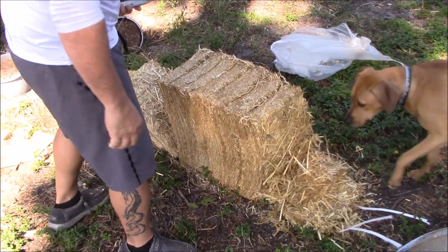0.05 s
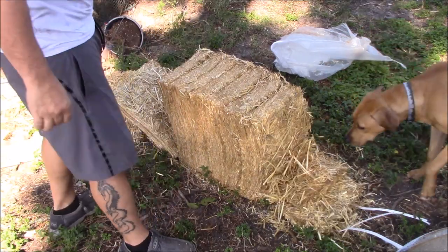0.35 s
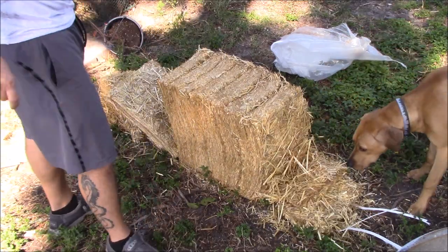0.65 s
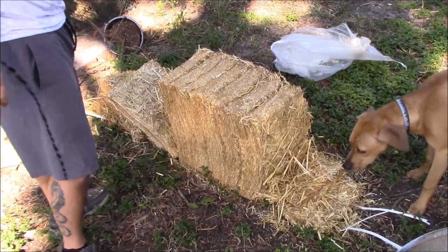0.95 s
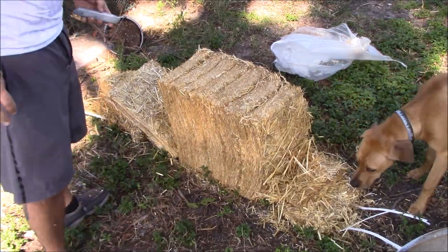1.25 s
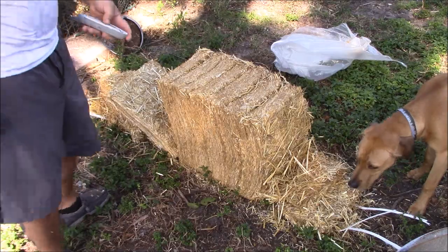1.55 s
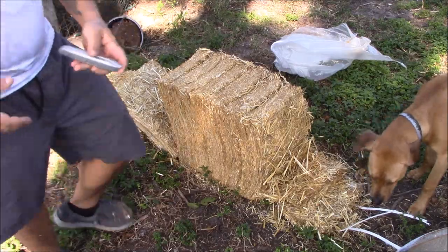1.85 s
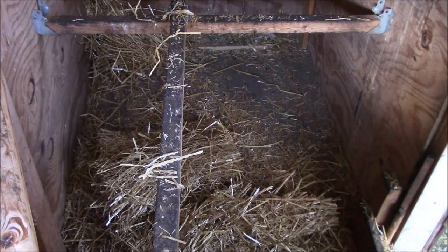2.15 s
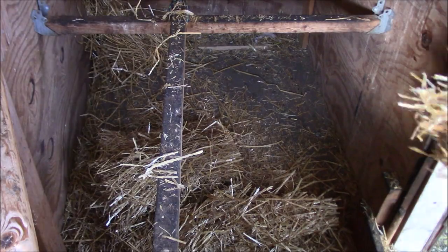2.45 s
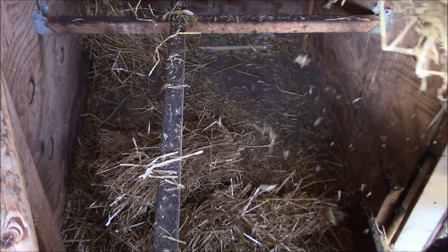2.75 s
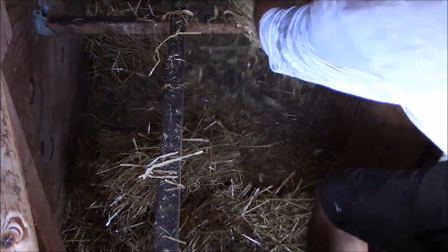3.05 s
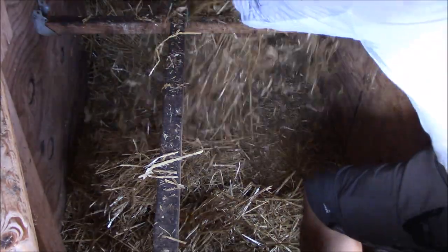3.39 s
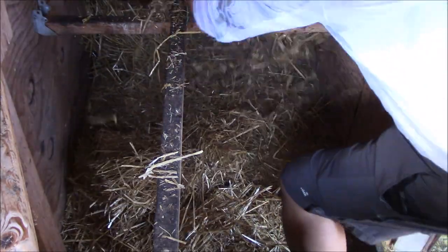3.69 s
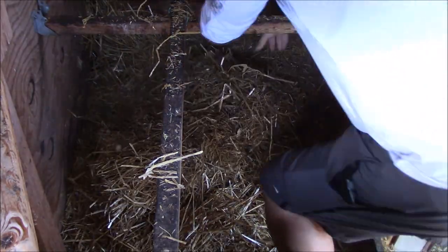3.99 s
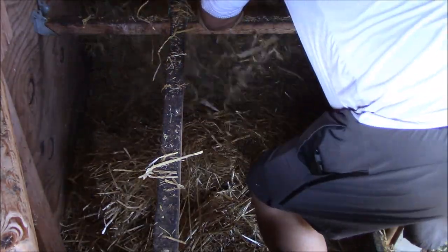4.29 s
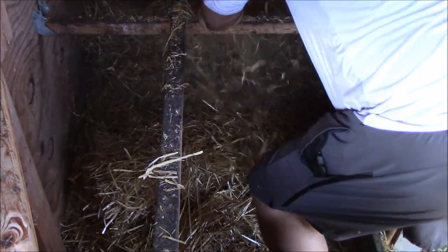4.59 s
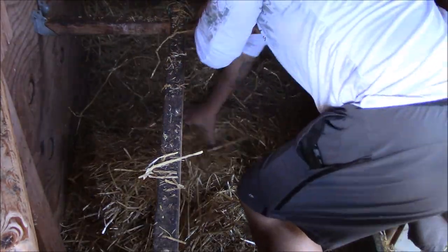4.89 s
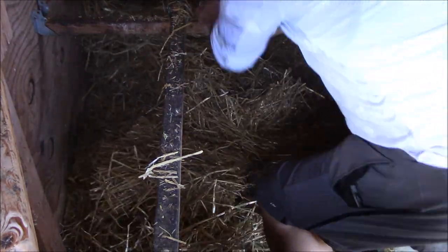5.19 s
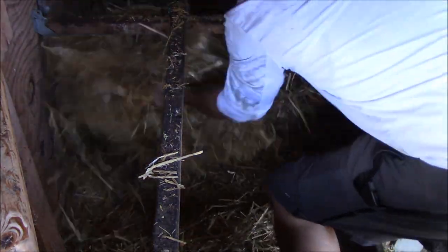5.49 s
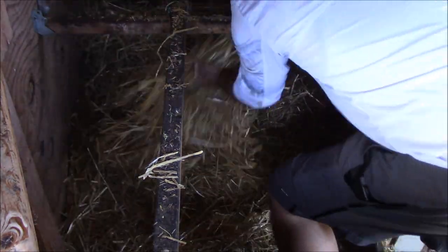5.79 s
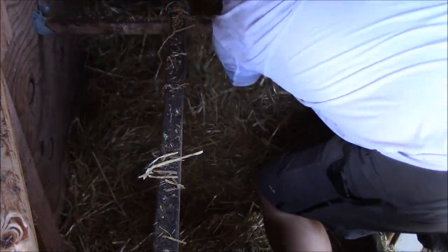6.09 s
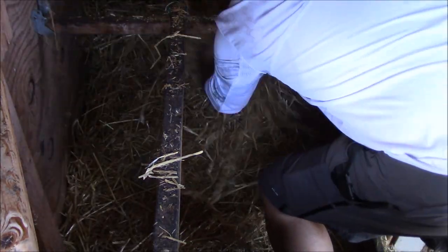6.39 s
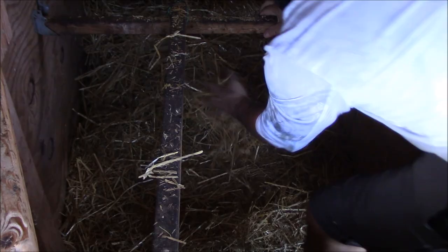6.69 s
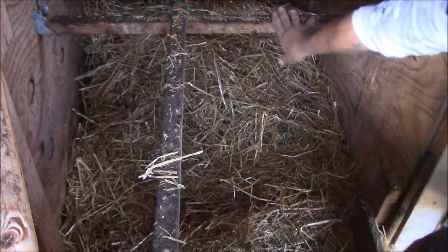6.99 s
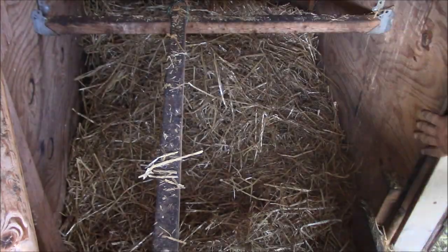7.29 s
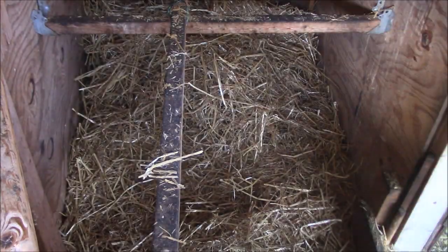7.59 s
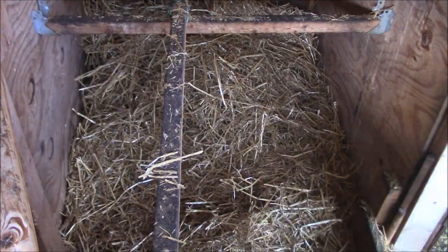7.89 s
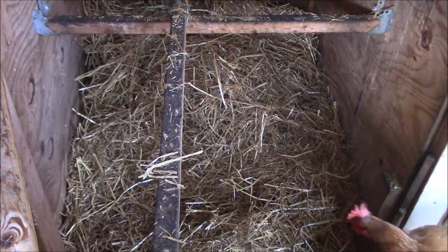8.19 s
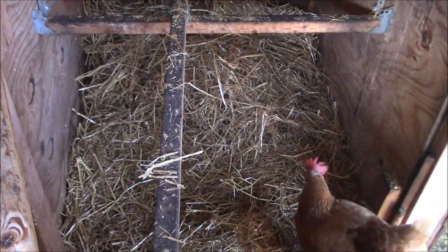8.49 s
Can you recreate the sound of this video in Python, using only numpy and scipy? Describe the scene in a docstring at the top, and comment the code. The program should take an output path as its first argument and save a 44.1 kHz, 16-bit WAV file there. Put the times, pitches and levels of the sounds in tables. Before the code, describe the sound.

A quiet yard opens with low outdoor air, faint shuffling on grass and tiny distant chirps. Sharp little clicks cluster between 0.5 and 0.8 seconds, a dull knock follows at 0.9, and a light gust touches the microphone around 1.5. At 2 seconds the sound cuts to a small, boxy plywood coop, heard close. Dry straw tears loudly, with thin squeals, a sharp snap and knocks on the boards around 2.3. From 3 to 7 seconds handfuls are shaken and packed down in waves of crunching and bright crackling, with scattered snaps and a firm wooden bump near 4. A chicken chatters softly in short, squeaky gliding notes, mostly from 4.3 to 7.7. The straw eases after 7, then rasps again with a thin high squeal around 7.8. A few more chicken notes and a last rustle come at about 8.5 seconds.

```python
"""A few sharp clicks and a dull knock sound beside a straw bale, over the low air of a yard.
After two seconds the scene jumps to a small plywood coop, where a hand tears straw loose and packs it down.
Countless tiny breaks make the straw crunch, rasp and crackle; thick stalks snap, and sliding ones squeal.
The boards ring briefly when bumped, and a bird chatters in short gliding notes."""
import sys
import numpy as np
from scipy import signal
from scipy.fft import rfft, irfft
from scipy.io import wavfile

SR = 44100
rng = np.random.default_rng(int(sys.argv[2]) if len(sys.argv) > 2 else 0)


def materialize(psi):
    """Save the field psi as 16-bit PCM at rate SR to the path in sys.argv[1].

    A 1-D psi becomes a single channel; in a 2-D psi each row is a channel.
    """
    bounded = np.clip(np.atleast_2d(psi).T, -1, 1)
    quanta = np.round(bounded * 32767).astype(np.int16)
    wavfile.write(sys.argv[1], SR, quanta)


N = 381465
TIME = np.arange(N) / SR
FREQS = np.maximum(np.fft.rfftfreq(N, 1 / SR), 1)


def from_db(db):
    """Decibels to gain."""
    return 10 ** (np.asarray(db) / 20)


def fader(rows):
    """A gain curve through (seconds, dB) points."""
    return from_db(np.interp(TIME, *np.transpose(rows)))


def drift(rate, size):
    """A random wander with a spread of about 1, turning `rate` times a second."""
    knots = rng.standard_normal(int(size * rate / SR) + 2)
    return np.interp(np.arange(size) * rate / SR, np.arange(len(knots)), knots) * np.sqrt(3 / 2)


def add(out, s, sound):
    """Mix a sound in at s seconds."""
    start = int(s * SR)
    out[start:start + len(sound)] += sound[:N - start]


def low_cut(x, hz):
    """Take away the bass."""
    return signal.sosfilt(signal.butter(4, hz, "high", fs=SR, output="sos"), x)


def colour(x, spectrum, band=(1, SR), resonances=()):
    """Shape x with an EQ curve and resonant peaks; rms 1 inside the band."""
    hz, db = np.transpose(spectrum)
    shape_db = np.interp(np.log(FREQS), np.log(hz), db)
    for centre, width, lift in resonances:
        shape_db = shape_db + lift / (1 + (2 * (FREQS - centre) / width) ** 2)
    bins = rfft(x) * from_db(shape_db)
    inside = (FREQS > band[0]) & (FREQS < band[1])
    return irfft(bins, N) * N / np.sqrt(2 * np.sum(np.abs(bins[inside]) ** 2))


def fade(energy, t60):
    """Each impulse of energy dies away by 60 dB in t60 seconds."""
    return signal.lfilter([1], [1, -from_db(-120 / (t60 * SR))], energy + 1e-18)


def impulses(rows):
    """One impulse for each (seconds, dB) row."""
    out = np.zeros(N)
    for s, db in rows:
        out[int(s * SR)] += from_db(db)
    return out


def fractures(per_s, spread_db, t60):
    """Energy of random tiny breaks, many weak and a few strong; mean 1."""
    breaks = rng.random(N) < per_s / SR
    strength = from_db(spread_db * np.clip(rng.standard_normal(N), -2.3, 2.3))
    energy = fade(breaks * strength ** 2, t60)
    return energy / energy.mean()


def grains(per_s, spread_db, t60, broad, rub):
    """Breaks ring in their own stalk's band or crack across all bands (share `broad`), over smooth rub."""
    edges = np.geomspace(400, 16000, 14)
    out = np.zeros(N)
    shared = fractures(per_s, spread_db, t60)
    white = rng.standard_normal((2, N))   # neighbouring bands get unrelated noise
    for k, (low, high) in enumerate(zip(edges, edges[1:])):
        energy = broad * shared + (1 - broad) * fractures(per_s, spread_db, t60) + rub
        corners, kind = ([low, high], "band") if k else (high, "low")
        band = signal.butter(2, corners, kind, fs=SR, output="sos")
        out += signal.sosfilt(band, np.sqrt(energy) * white[k % 2])
    return out


def strike(modes, vary_db):
    """Decaying modes, each with a new strength for every blow; peak 1."""
    t = TIME[:SR // 4]
    hz, db, t60 = np.transpose(modes)[:, :, None]
    strength = from_db(db + vary_db * rng.standard_normal(hz.shape)) * rng.choice([-1, 1], hz.shape)
    ring = np.sum(strength * np.exp(-np.log(1000) * t / t60) * np.sin(2 * np.pi * hz * t), axis=0)
    return ring / np.abs(ring).max()


def gliding_tones(rows, body, wobble_hz, flutter_db, rasp, fall_db):
    """Tones swell, glide and fade; a body weights their overtones, and roughness makes them hoarse."""
    out, harmonics = np.zeros(N), np.arange(1, 7)
    body_hz, body_db = np.transpose(body)
    for s, length, hz, glide, db, rough in rows:
        size = int(length * SR)
        progress = np.linspace(0, 1, size)
        pitch = hz * 2 ** (glide * (progress - .5)) + wobble_hz * rough * drift(480, size)
        phase = 2 * np.pi * np.cumsum(pitch) / SR
        lift_db = np.interp(np.log(harmonics * hz), np.log(body_hz), body_db)
        partials = from_db(lift_db - fall_db * np.log2(harmonics)) * (harmonics * hz < SR / 2)
        tone = partials @ np.sin(np.outer(harmonics, phase)) / np.linalg.norm(partials)
        swell = np.abs(np.sin(np.pi * progress)) ** 0.52
        swell *= from_db(flutter_db * rough * drift(220, size))
        swell *= 1 + rasp * rough * drift(2500, size)
        add(out, s, from_db(db) * tone * swell / np.sqrt(np.mean(swell ** 2) / 2))
    return out


def reflections(x, t60, dull_hz):
    """Dense, dull echoes from nearby surfaces, in two unrelated channels."""
    t = TIME[:SR // 4]
    echoes = rng.standard_normal((2, len(t))) * np.exp(-np.log(1000) * t / t60) * (t > .003)
    echoes = signal.sosfilt(signal.butter(1, dull_hz, fs=SR, output="sos"), echoes)
    echoes /= np.sqrt(np.sum(echoes ** 2, axis=1, keepdims=True))
    return signal.fftconvolve(x[None], echoes, axes=1)[:, :N]


# EQ of the outdoor bed. Each row: frequency in Hz, gain in dB.
AIR_EQ = [(15, -48), (25, -69), (85, -8.5), (243, -2.5), (496, -4), (525, -7), (554, -5), (1220, -11.5),
          (1520, -15.5), (2000, -19), (2600, -52), (4400, -120)]

def outdoor_air():
    """A steady bed of low outdoor rumble."""
    return from_db(-51.5) * colour(rng.standard_normal(N), AIR_EQ)


# The breeze swells and eases. Each row: time in seconds, level in dB before gusts.
BREEZE_FADER = [(0, -76), (1.05, -71), (1.55, -56.5), (2.0, -67)]

def breeze():
    """Light gusts rumble on the microphone, partly on each side separately."""
    eddies = rng.standard_normal(N) + from_db(-1) * rng.standard_normal((2, N))
    rumble = signal.sosfilt(signal.butter(2, [45, 140], "band", fs=SR, output="sos"), eddies)
    gusts = from_db(1.6 * drift(7.8, N))
    return fader(BREEZE_FADER) * gusts * rumble / rumble.std()


# Movement on the grass. Each row: time in seconds, relative level in dB.
SHUFFLE_FADER = [(0.0, -49), (0.412, -53), (0.782, -53.5), (0.948, -55), (1.98, -56)]
# EQ of the grass and the far chirps. Each row: frequency in Hz, gain in dB.
YARD_EQ = [(900, -2.5), (2000, 1), (3000, 0), (4500, -6), (7000, -8.5), (11000, -15), (16000, -24)]

def grass():
    """Faint shuffling on grass: mostly smooth rub, with a fine grain of breaks."""
    rustle = grains(per_s=420, spread_db=4, t60=0.014, broad=1.0, rub=3.3)
    return from_db(1) * fader(SHUFFLE_FADER) * colour(rustle, YARD_EQ)


# Distant calls. Each row: start and length in seconds, pitch in Hz, glide in octaves,
# relative level in dB, roughness from 0 to 1.
FAR_CHIRPS = [(.19, 0.052, 2520, 0.25, -46.5, 0.64), (1.275, 0.02, 1116, -.05, -51, 0.35),
              (1.33, 0.073, 3020, -0.069, -61, 0.1), (1.56, .092, 2920, -0.044, -62, 0.26),
              (1.642, 0.013, 1230, 0.021, -50.5, .2), (1.79, 0.088, 2960, .07, -60, .46)]

def far_chirps():
    """Faint chirps with few overtones, each trailing a soft echo."""
    calls = gliding_tones(FAR_CHIRPS, YARD_EQ, wobble_hz=254, flutter_db=4.5, rasp=0.96, fall_db=22)
    return from_db(3) * calls + from_db(-5.5) * reflections(calls, t60=0.51, dull_hz=6000)[0]


# Knocks on the ground. Each row: start in seconds, level in dB.
KNOCKS = [(0.917, -25), (0.942, -36.5), (0.962, -36)]
# Their dull tone. Each row: frequency in Hz, gain in dB.
KNOCK_EQ = [(30, -40), (90, -25), (170, -10), (240, 5), (420, 2.5), (760, -1.5), (900, -20), (1300, -10),
            (3000, -19), (9000, -31)]

def ground_knocks():
    """The ground answers each knock with a short, dark burst of noise."""
    envelope = np.sqrt(fade(impulses(KNOCKS) ** 2, t60=0.12))
    return envelope * colour(rng.standard_normal(N), KNOCK_EQ)


# Clicks in the yard. Each row: start in seconds, relative level in dB.
CLICK_HITS = [(.493, -25), (.5084, -12.5), (.5495, -19.5), (.6327, -8.5), (.66, -14.5), (.6755, -5.5),
              (.7377, -18), (.886, -27), (.917, -20.5), (.942, -26.5), (1.508, -22.5)]
# Their ring. Each row: frequency in Hz, relative level in dB, 60 dB decay time in seconds.
CLICK_RING = [(1900, -54, 0.02), (2690, -32, .02), (3720, 0, 0.023), (4150, -1.5, 0.03),
              (4610, -0.5, 0.022), (6000, -39, .025), (8230, -5, 0.031), (9960, 1, 0.022)]
# The bright crack of clicks and snapping stalks. Each row: frequency in Hz, gain in dB.
CRACK_EQ = [(60, -53), (400, -25.5), (1500, -0.5), (4500, 6.5), (9000, 2.5), (15500, -3.5)]

def clicks():
    """A small hard object clicks: a bright crack, a brief ring and a faint tail."""
    ring = np.zeros(N)
    for s, db in CLICK_HITS:
        add(ring, s, from_db(db) * strike(CLICK_RING, vary_db=1))
    energy = impulses(CLICK_HITS) ** 2
    burst = np.sqrt(fade(energy, t60=0.026) + from_db(-41.5) * fade(energy, t60=0.28))
    return from_db(-5.5) * ring + from_db(-11) * burst * colour(rng.standard_normal(N), CRACK_EQ)


# Single squeaky notes. Each row: start and length in seconds, pitch in Hz, glide in octaves,
# relative level in dB, roughness from 0 to 1.
BIRD_CALLS = [(2.526, .014, 2360, -.05, -41, 0.3), (2.558, 0.03, 4110, 0.034, -42, 0.4),
              (2.605, 0.036, 2780, -.35, -42, 0.87), (2.642, 0.093, 2365, -.025, -39.5, 0.3),
              (2.757, 0.0094, 2150, -0.2, -36.5, 0.3), (2.803, .012, 1400, 0.0078, -39.5, .56),
              (4.974, 0.019, 1704, -0.11, -35, .3), (5.007, 0.059, 1685, .03, -32, 0.14),
              (5.355, 0.025, 1835, -0.022, -34.5, 0.8), (5.441, 0.023, 1676, -0.044, -31.5, 0.25),
              (5.487, 0.03, 1740, 0.075, -35, 0.63), (5.957, 0.024, 1653, -0.13, -30.5, 0.18),
              (5.997, 0.048, 1740, 0.38, -34, .23), (6.067, 0.026, 1470, -0.39, -30, 0.56),
              (6.117, 0.046, 3200, 0.45, -38.5, 0.4), (6.156, 0.11, 3464, 0.16, -36.5, 0.9),
              (6.3, 0.037, 3350, 0.29, -37, 0.8), (6.383, .026, 3320, .15, -39, 0.66),
              (6.622, 0.015, 1860, .14, -35.5, .9), (6.678, .037, 2950, -0.056, -42.5, 0.3),
              (6.775, 0.058, 1546, -0.056, -38.5, 0.08), (6.886, 0.02, 1624, -.18, -32, 0.38),
              (6.958, .014, 1590, -0.15, -29.5, .37), (6.985, .03, 1276, -0.2, -47, 0.08),
              (7.075, 0.041, 1166, -0.307, -40.5, .45), (7.388, 0.07, 1904, -0.09, -38.5, 0.24),
              (7.45, 0.041, 1620, -0.3, -43.5, 0.18), (7.516, 0.057, 1335, -.26, -47, 0.47),
              (7.606, 0.086, 1770, 0.42, -43.5, 0.4), (8.35, 0.052, 2680, -0.083, -46.5, .3),
              (8.392, .036, 3090, .3, -38, 0.7)]
# Even runs of short notes. Each row: start in seconds, note count, spacing in seconds, pitch in Hz,
# glide in octaves, relative level in dB, roughness from 0 to 1.
BIRD_RUNS = [(4.276, 3, 0.034, 2240, -0.0027, -32, .3), (4.378, 2, .04, 3940, .18, -31.5, .55),
             (5.121, 4, .058, 1626, 0.19, -35.5, .9), (5.247, 2, .06, 2250, .05, -38.5, .5),
             (8.459, 2, 0.042, 2325, 0, -27.5, 0.4)]
# Resonances of the throat. Each row: frequency in Hz, gain in dB.
THROAT_EQ = [(1200, 2), (1650, 1.5), (2300, -6), (3300, -0.5), (4600, 5), (5050, -5.5), (6600, -9),
             (10000, -9.5), (13500, -20)]

def bird():
    """A bird squeaks and chatters near the coop: short gliding notes, some clear, some hoarse."""
    note_share, scatter_octaves = 0.28, 0.016
    notes = list(BIRD_CALLS)
    for s, count, spacing, hz, glide, db, rough in BIRD_RUNS:
        for k in range(count):
            pitch = hz * 2 ** (scatter_octaves * rng.standard_normal())
            notes.append((s + k * spacing, note_share * spacing, pitch, glide, db, rough))
    voice = gliding_tones(notes, THROAT_EQ, wobble_hz=171, flutter_db=4.5, rasp=0.5, fall_db=5.5)
    return from_db(0.43) * low_cut(voice, hz=600)


# Bumps on the coop. Each row: start in seconds, relative peak in dB, low cut and high cut in Hz.
BOARD_HITS = [(2.08, -14, 251, 1500), (2.133, -11, 775, 2500), (2.287, -6, 480, 2500),
              (2.883, -27.5, 338, 1190), (3.943, -11.5, 297, 1500), (3.947, -3.5, 188, 1700),
              (3.95, -33, 55, 200), (3.957, -26, 300, 1200), (4.071, -22.5, 490, 1800),
              (4.391, -26, 220, 1200), (4.874, -21, 696, 2500), (4.884, -20, 640, 2500),
              (6.263, -18, 730, 1800), (7.366, -13.5, 517, 600)]
# The plywood's ring. Each row: frequency in Hz, relative level in dB, 60 dB decay time in seconds.
BOARD_MODES = [(250, 6, 0.02), (350, -9, 0.057), (497, 6.5, 0.029), (601, 6.5, 0.034), (790, 6.5, 0.02),
               (990, -7, 0.03), (1253, -2, 0.052), (1200, 13, 0.0065), (1620, 10, 0.0066),
               (2121, -7.5, 0.071), (3620, -4, 0.057)]

def board_bumps():
    """Blows on wood: light ones miss the low modes, soft ones the high modes."""
    out = np.zeros(N)
    for s, db, low_hz, high_hz in BOARD_HITS:
        lightness = signal.butter(5, low_hz, "high", fs=SR, output="sos")
        softness = signal.butter(1, high_hz, fs=SR, output="sos")
        thud = signal.sosfilt(np.vstack([lightness, softness]), strike(BOARD_MODES, vary_db=1.5))
        add(out, s, from_db(db) * thud / np.abs(thud).max())
    return from_db(-3) * out


# Dry stalks sliding. Each row: start and length in seconds, pitch in Hz, glide in octaves,
# relative level in dB, roughness from 0 to 1.
STALK_SLIDES = [(2.205, .014, 12100, -.01, -20, 0.4), (2.207, 0.04, 7050, -0.068, -13.5, 0.26),
                (2.222, .017, 6040, -.02, -23, .1), (2.241, 0.035, 6730, -0.022, -18, 0.16),
                (2.294, .017, 5930, -.02, -25, .2), (2.305, 0.021, 6520, 0.021, -27.5, .15),
                (2.397, 0.089, 6645, -0.003, -25, .12), (7.711, .016, 12250, -.02, -37, 1),
                (7.791, .046, 15330, 0, -14, .08), (7.835, 0.064, 15400, 0, -18.5, .15)]
# How well a stalk radiates its overtones. Each row: frequency in Hz, gain in dB.
STALK_EQ = [(6600, -1.5), (13500, -1)]

def stalk_squeals():
    """Stalks stick and slip on each other; uneven slips add rasp, and thin stalks radiate no bass."""
    squeal = gliding_tones(STALK_SLIDES, STALK_EQ, wobble_hz=219, flutter_db=7, rasp=0.58, fall_db=5.5)
    return from_db(0.7) * low_cut(squeal, hz=600)


# Single stalks breaking. Each row: start in seconds, relative level in dB, 60 dB decay time in seconds.
STALK_BREAKS = [(2.283, -8, 0.11), (2.611, -28.5, .056), (3.3467, -19, .025), (3.639, -21, 0.029),
                (4.009, -24, 0.026), (4.241, -26, .025), (4.441, -21, 0.017), (5.156, -23, .03),
                (5.933, -22.5, 0.054), (6.465, -15.5, 0.019), (6.547, -25, 0.043), (7.089, -32, 0.11),
                (7.311, -21, 0.016), (8.047, -28, 0.19), (8.264, -23, 0.042), (8.563, -27.5, 0.093)]

def stalk_snaps():
    """A thick stalk breaks with a crack and a short splintering tail."""
    energy, t = np.zeros(N), TIME[:SR // 4]
    for s, db, t60 in STALK_BREAKS:
        add(energy, s, from_db(db - 60 * t / t60) ** 2)
    cracks = np.sqrt(energy) * colour(rng.standard_normal(N), CRACK_EQ)
    return from_db(-4.5) * low_cut(cracks, hz=130)


# Handfuls shaken loose. Each row: start and end of the hold, rise time and fall time, all in seconds,
# then relative crush and crackle levels in dB.
SHAKES = [(3.13, 3.925, 0.62, 0.5, -44, -35), (4.219, 4.766, 0.13, 0.23, -43, -34.5),
          (5.028, 5.203, 0.34, 0.17, -46, -37.5), (5.447, 5.755, .07, 0.53, -46, -34),
          (5.98, 6.579, 0.26, 0.44, -45, -34)]
# Quick grabs and shoves. Each row: peak time and length in seconds,
# then relative crush, tear and crackle levels in dB.
QUICK_GRABS = [(2.048, 0.043, -51, -51, -41), (2.088, 0.049, -32.5, -38, -27),
               (2.167, 0.097, -30.5, -32.5, -37), (2.219, 0.089, -30.5, -24.5, -25),
               (2.29, 0.1, -25, -24, -33.5), (2.438, 0.095, -53, -51, -42), (2.491, 0.04, -39.5, -40, -44),
               (2.653, 0.19, -51, -48, -52), (3.018, 0.047, -42.5, -39.5, -32.5),
               (3.174, 0.077, -38.5, -44, -34), (3.4, 0.08, -47, -35, -28.5),
               (3.509, 0.059, -34.5, -45, -32.5), (3.775, 0.022, -34, -51, -38),
               (3.841, 0.021, -39, -43, -31), (3.948, 0.028, -38, -42, -24), (4.393, 0.056, -37, -38, -31),
               (4.769, 0.049, -48, -46, -29.5), (4.886, 0.038, -37, -59, -35),
               (5.073, 0.053, -33, -31.5, -30), (5.284, 0.07, -38, -50, -42.5),
               (5.449, 0.049, -41.5, -32.5, -37), (5.636, 0.18, -39, -41, -31),
               (5.942, 0.031, -38, -39, -35), (6.083, 0.072, -40.5, -34, -38),
               (6.395, 0.048, -44, -38, -30.5), (6.476, 0.036, -36.5, -42, -33),
               (6.824, 0.042, -71, -52, -46), (7.091, 0.063, -37.5, -54, -39.5),
               (7.547, 0.062, -52, -45.5, -51), (7.716, 0.013, -42, -40, -39),
               (7.743, .06, -39, -32.5, -46), (7.829, 0.17, -35, -29.5, -35),
               (7.949, 0.15, -36.5, -36.5, -38.5), (8.535, 0.29, -45, -44.5, -49),
               (8.619, .04, -38.5, -36, -37.5)]

def hand_moves():
    """The hand rides three gains, crush, tear and crackle: shakes rise, hold and fall; grabs swell."""
    settling_db = [-48.5, -52, -55]   # loose straw never quite rests
    ramp_db, tear_offset_db = 31, -2   # swing over one rise or fall time; tear against crush in a shake
    power = np.outer(from_db(settling_db) ** 2, np.ones(N))
    for start, end, rise, fall, crush_db, crackle_db in SHAKES:
        outside_hold = np.maximum(0, np.maximum((start - TIME) / rise, (TIME - end) / fall))
        gains = from_db([crush_db, crush_db + tear_offset_db, crackle_db])
        power += np.outer(gains, from_db(-ramp_db * outside_hold)) ** 2
    for s, length, *levels_db in QUICK_GRABS:
        near = slice(int((s - 2 * length) * SR), int((s + 2 * length) * SR))
        swell = np.exp(-np.abs(2 * (TIME[near] - s) / length) ** 1.85)   # almost a bell curve
        power[:, near] += np.outer(from_db(levels_db), swell) ** 2
    return np.sqrt(power)


# EQs of the straw's low, middle and top layers. Each row: frequency in Hz, gain in dB.
CRUSH_EQ = [(40, -56), (110, -31.5), (220, -19), (330, -13.5), (470, -5), (780, -1.5), (1250, 0.5),
            (1750, -0.5), (2300, -12.5), (3500, -29), (9000, -52)]
TEAR_EQ = [(700, -40), (1500, 0.5), (2000, 6), (3300, -1), (4600, 0), (6500, -3.5), (15000, -36)]
CRACKLE_EQ = [(2000, -43), (4000, -5), (5300, 0), (8000, 2), (11500, 2), (15500, 0.5)]
# The coop's boxy resonances. Each row: centre in Hz, width in Hz, lift in dB.
COOP_PEAKS = [(447, 37, 9), (524, 17, 10), (688, 25, 7.5), (903, 27, 4), (1166, 33, 6.5), (1334, 37, 8),
              (1548, 99, 4), (2960, 140, 6.5), (3560, 350, 8.5), (4620, 120, 7)]

def straw():
    """The bulk crunches dully, tearing stalks rasp, thin dry ends crackle."""
    crush, tear, crackle = hand_moves()
    bulk = grains(per_s=200, spread_db=6, t60=0.067, broad=0.17, rub=0.094)
    bulk = colour(bulk, CRUSH_EQ, band=(400, 1450), resonances=COOP_PEAKS)
    rasp = grains(per_s=360, spread_db=8, t60=0.059, broad=0.49, rub=0.068)
    rasp = colour(rasp, TEAR_EQ, band=(2200, 5000), resonances=COOP_PEAKS)
    dense = grains(per_s=1300, spread_db=5.5, t60=0.022, broad=0.5, rub=0.25)
    sparse = np.sqrt(fractures(per_s=220, spread_db=8.5, t60=0.064) + 0.26) * rng.standard_normal(N)
    busy = np.clip(crackle / from_db(-41), 0, 1)   # a light touch breaks fewer stalks: ticks stand out
    ends = colour(np.sqrt(busy) * dense + np.sqrt(1 - busy) * sparse, CRACKLE_EQ, band=(6000, 15000))
    return from_db(-0.33) * crush * bulk + from_db(-1) * tear * rasp + from_db(0.47) * crackle * ends


def scene():
    """First the yard, then a hard cut to the coop; the image is close to mono."""
    yard_end_s, coop_start_s = 2.005, 2.03
    in_yard = TIME < yard_end_s
    in_coop = np.clip((TIME - coop_start_s) / 0.0033, 0, 1)
    accents = stalk_squeals() + bird() + board_bumps() + stalk_snaps()
    yard = outdoor_air() + grass() + ground_knocks() + far_chirps()
    direct = in_yard * yard + clicks() + in_coop * straw() + accents
    mid = direct + from_db(-12.5) * reflections(accents, t60=0.052, dull_hz=5900)[0]
    side = from_db(-28) * reflections(direct, t60=0.036, dull_hz=13800)[1]
    balance = from_db([[0.17], [-0.17]])
    return np.array([mid + side, mid - side]) * balance + in_yard * breeze()


def record(dry):
    """A steep high cut at 15.9 kHz takes off the very top."""
    return signal.sosfilt(signal.ellip(12, .1, 80, 15900, fs=SR, output="sos"), dry)


dry = scene()
out = record(dry)
materialize(out)
```